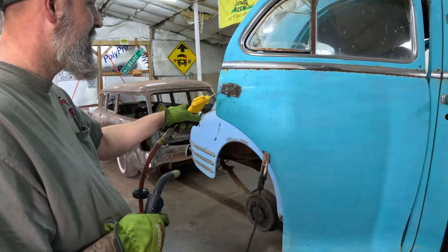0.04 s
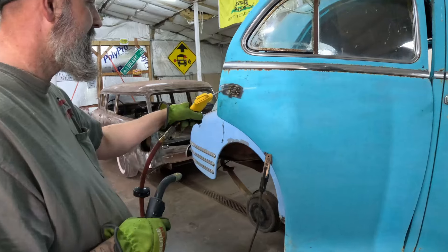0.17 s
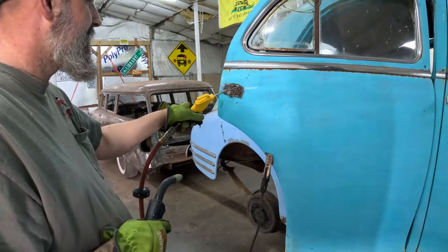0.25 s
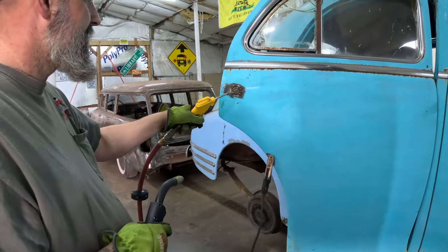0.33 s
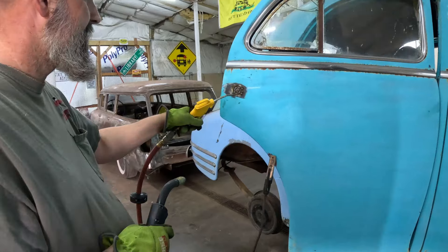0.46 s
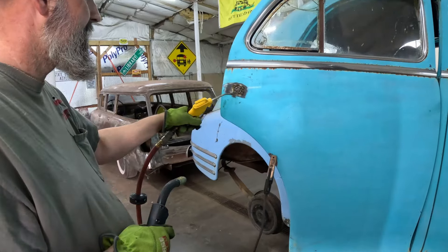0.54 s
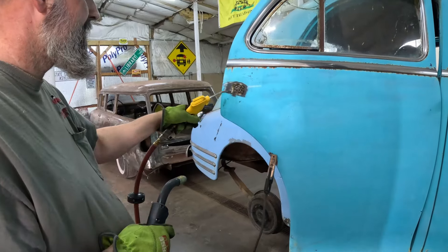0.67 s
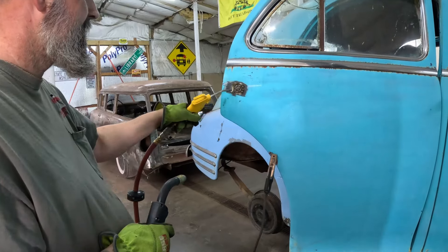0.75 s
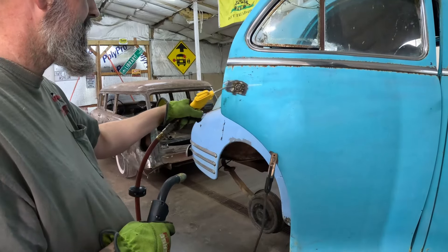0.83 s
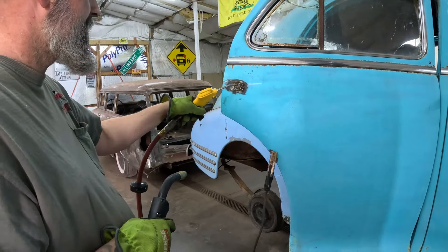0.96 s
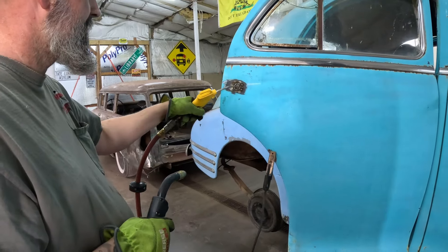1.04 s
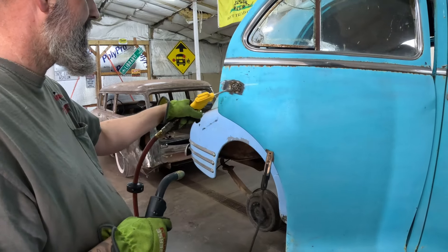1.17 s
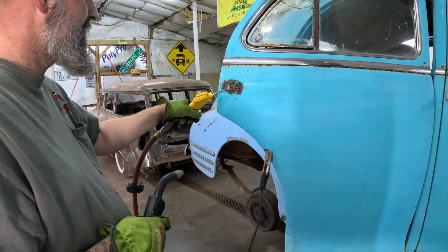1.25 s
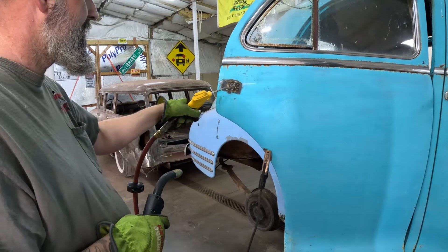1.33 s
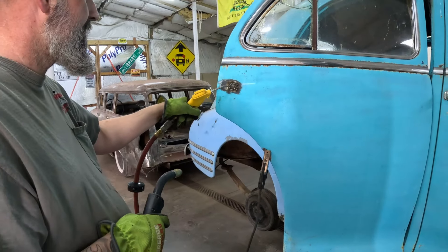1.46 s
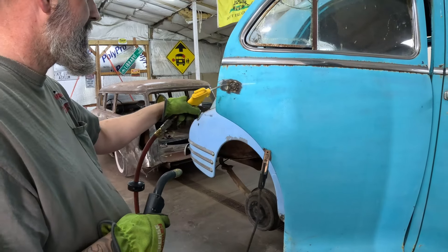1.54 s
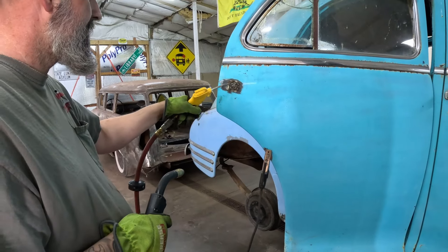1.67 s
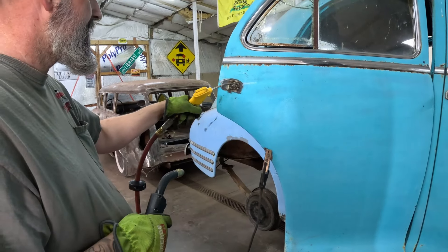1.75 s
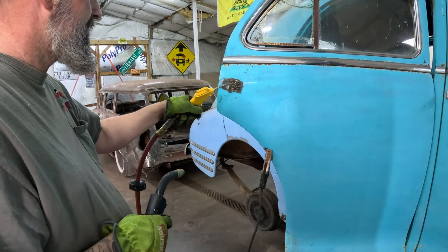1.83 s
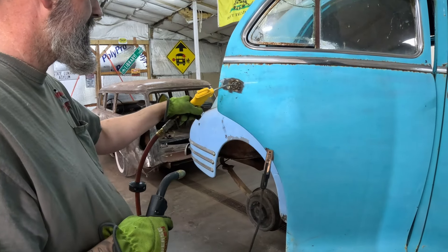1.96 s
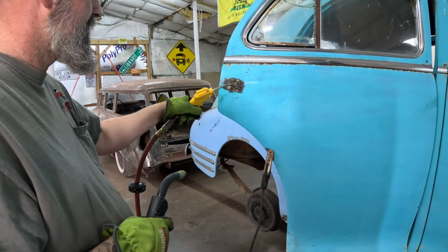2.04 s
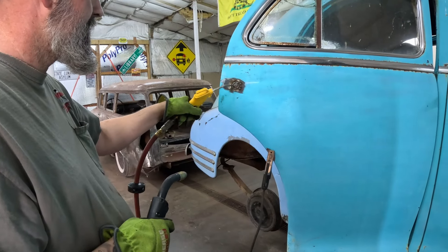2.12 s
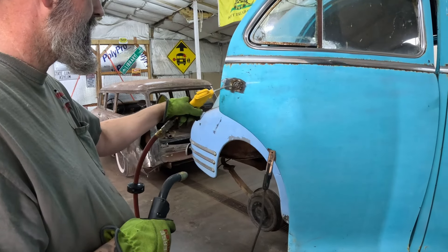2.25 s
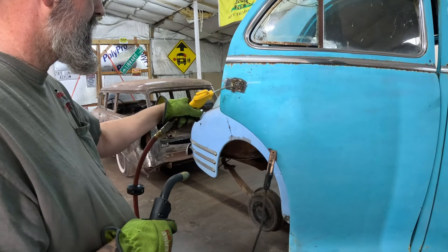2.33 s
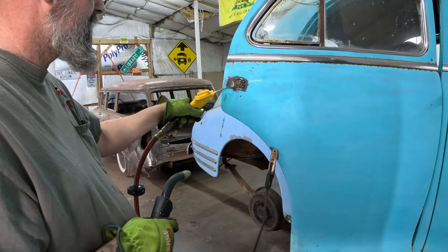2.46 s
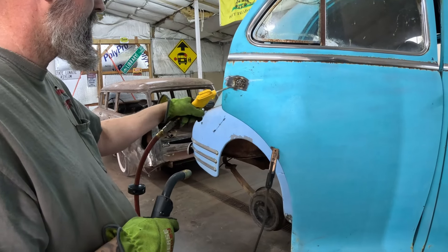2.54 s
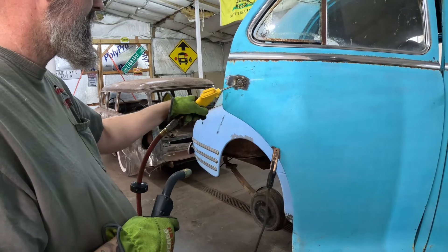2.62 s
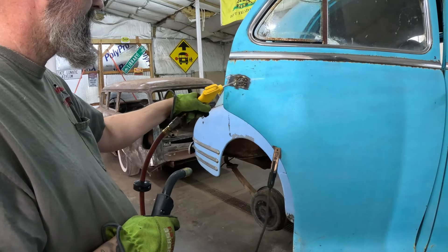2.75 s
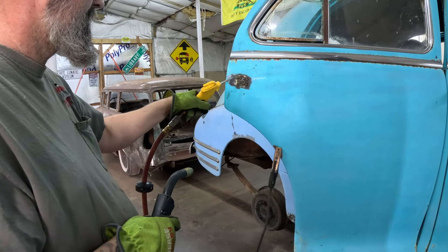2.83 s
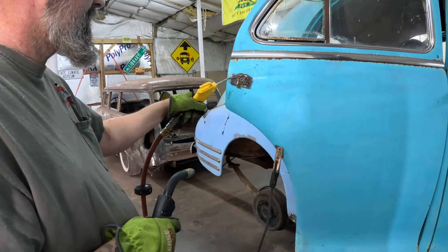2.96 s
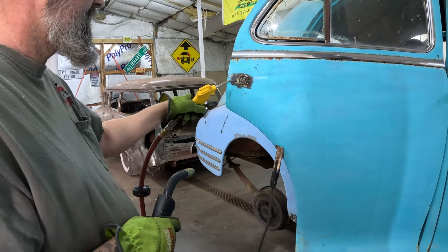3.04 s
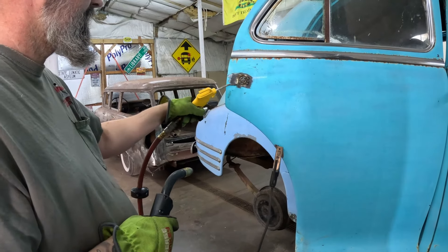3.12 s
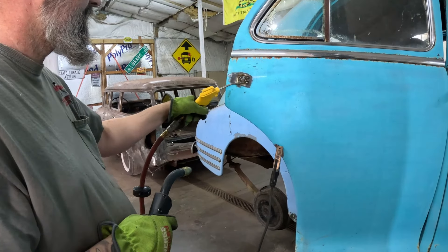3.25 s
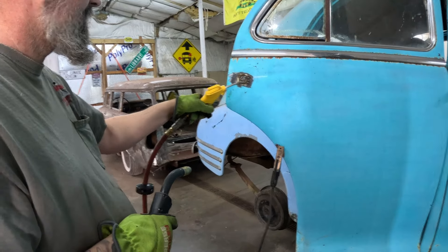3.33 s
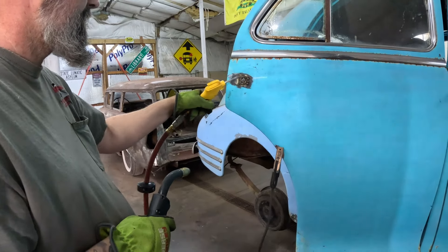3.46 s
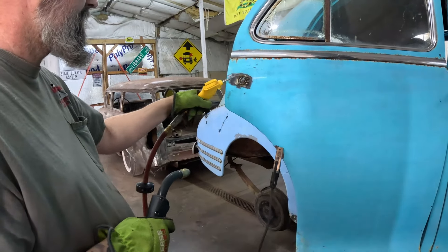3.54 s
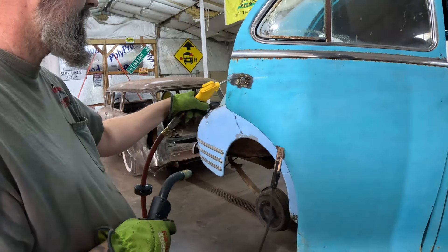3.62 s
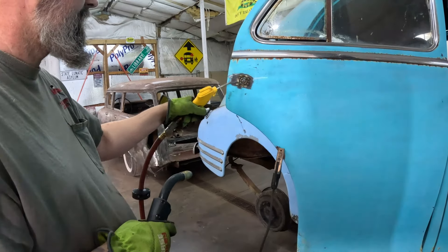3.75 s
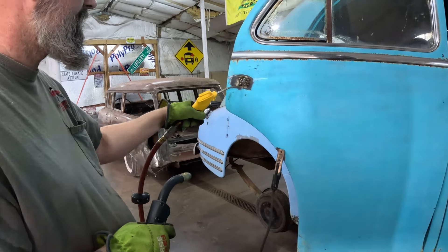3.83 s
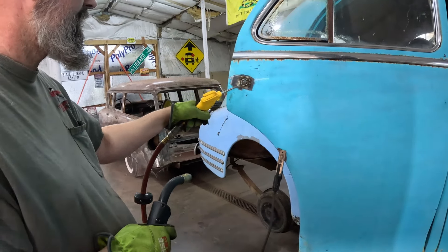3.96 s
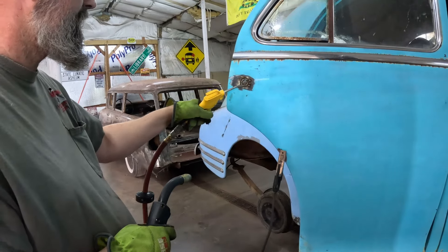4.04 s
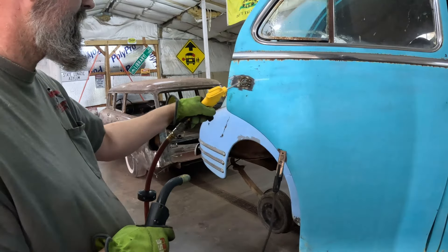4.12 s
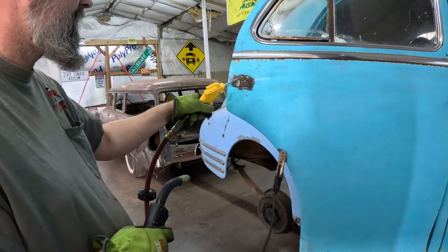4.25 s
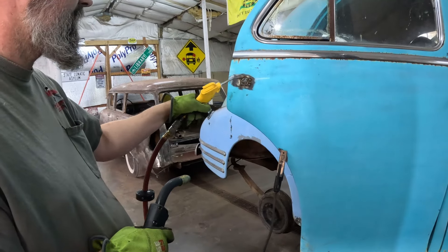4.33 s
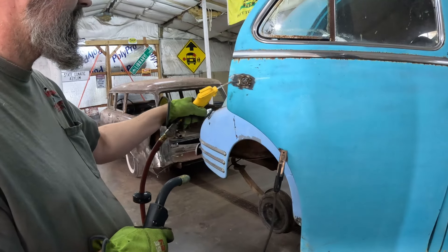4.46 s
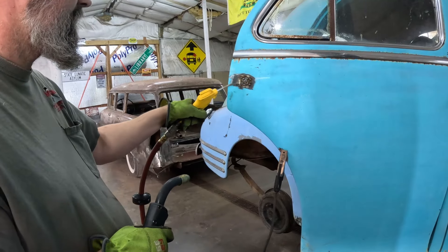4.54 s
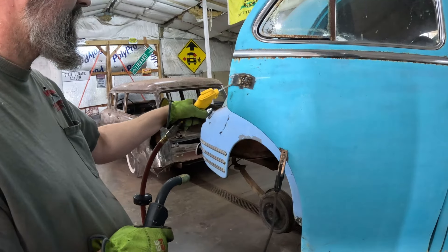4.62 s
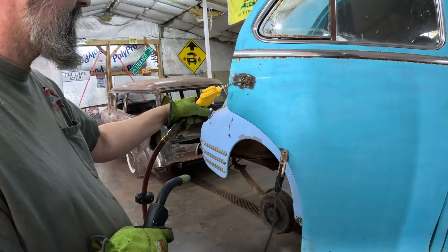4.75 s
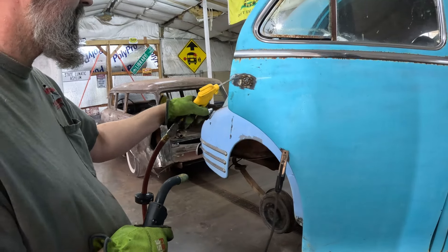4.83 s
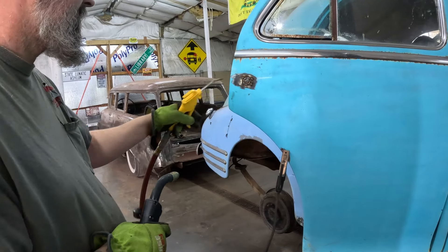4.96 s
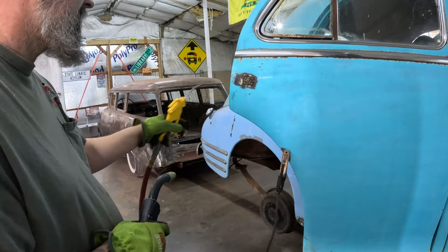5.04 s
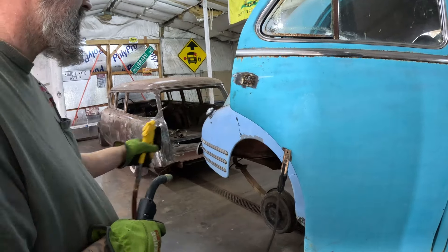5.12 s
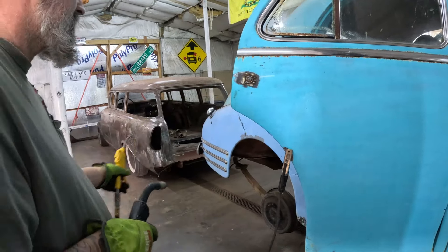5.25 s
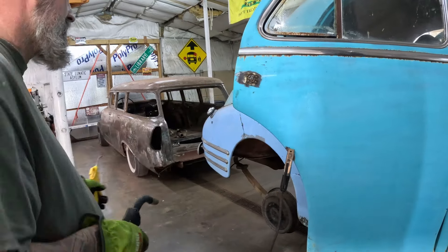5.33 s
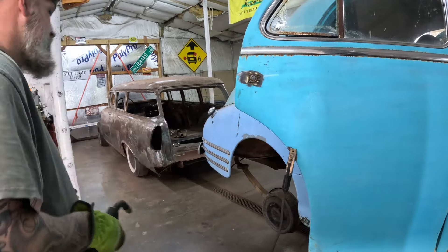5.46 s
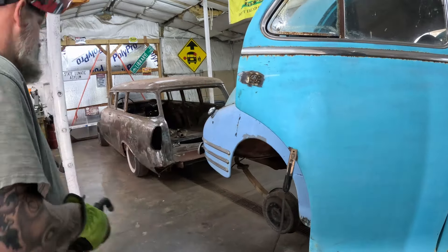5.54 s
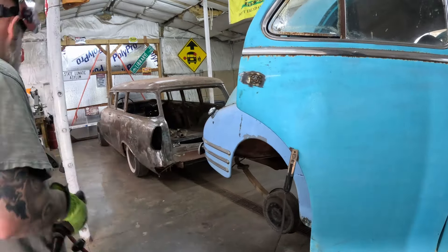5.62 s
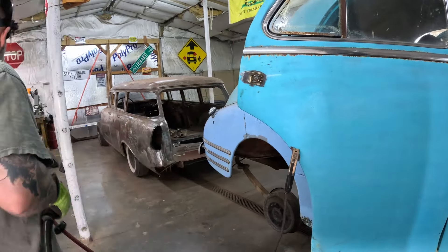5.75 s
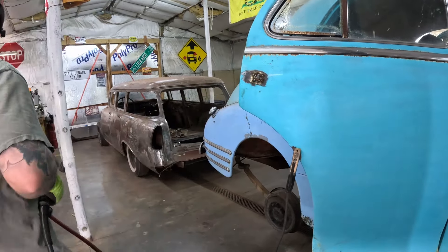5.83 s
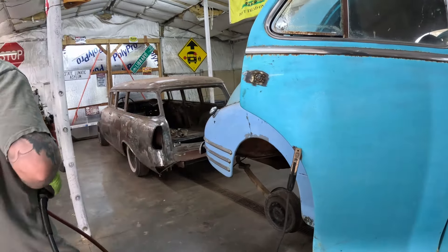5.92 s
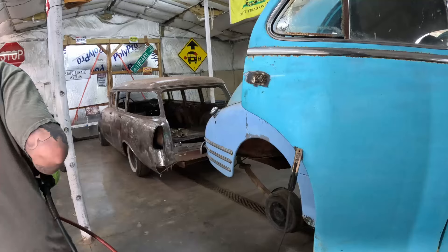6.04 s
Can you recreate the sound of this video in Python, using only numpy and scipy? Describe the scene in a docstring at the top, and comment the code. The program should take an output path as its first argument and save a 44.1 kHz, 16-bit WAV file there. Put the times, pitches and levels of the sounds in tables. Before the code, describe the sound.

A blow gun blasts air along sheet metal, its bright hiss shifting colour and buffeting, then stops abruptly into quiet, faintly humming workshop air.

```python
"""Sheet-metal workshop: a compressed-air blow gun cools a weld on a car body, then the trigger is let go.
The jet is noise shaped over frequency and time: roar off the panel, wide hiss on edges, coloured bands
where it blows across hollows, low buffeting. Its diffuse echo rings out over a low hum of noise
and a sine drone that grows late. One small tick, made of short modes and a rattle, comes near the end."""
import sys
import numpy as np
from scipy import signal
from scipy.io import wavfile
from scipy.ndimage import uniform_filter1d, map_coordinates

SR = 44100
rng = np.random.default_rng(int(sys.argv[2]) if len(sys.argv) > 2 else 0)


def transcribe(u):
    """Save the signal u as a 16-bit wav file named by the first command-line argument.

    u: samples, shape (n,) or (channels, n), limited to [-1, 1]; the rate is SR.
    q: integer samples, one column per channel.
    """
    v = np.clip(np.atleast_2d(u).T, -1, 1)
    q = np.round(v * 32767).astype(np.int16)
    wavfile.write(sys.argv[1], SR, q)


N = 268436
FRAME, OVERLAP = 2048, 1792  # samples
HZ, TIME = signal.stft(np.zeros(N), SR, nperseg=FRAME, noverlap=OVERLAP)[:2]  # grid of all gains


def undb(db):
    """Decibels to gain."""
    return 10 ** (np.asarray(db) / 20)


def at_hz(hz, values, left=None, right=None):
    """Table values at every grid frequency, interpolated over log frequency."""
    return np.interp(np.log(HZ + 1), np.log(hz), values, left, right)


def colour(points):
    """Spectrum in dB as a column; -120 dB outside the table."""
    hz, db = np.transpose(points)
    return at_hz(hz, db, -120, -120)[:, None]


def curves(table):
    """Table columns against time."""
    s, *columns = np.transpose(table)
    return [np.interp(TIME, s, c) for c in columns]


def bump(hz, width_hz):
    """Gaussian of height 1 over frequency; width is its standard deviation."""
    return np.exp(-.5 * ((HZ[:, None] - hz) / width_hz) ** 2)


def patches(width_hz, length_s):
    """Smooth random field over frequency and time, spread 1: eddies never hold one colour."""
    grid = rng.standard_normal((200, 200))
    points = np.meshgrid(HZ / width_hz, TIME / length_s, indexing="ij")
    field = map_coordinates(grid, points, order=1, mode="wrap")
    return field / field.std()


def frames(x):
    """Short-time spectra."""
    return signal.stft(x, SR, nperseg=FRAME, noverlap=OVERLAP)[2]


def filtered(gain):
    """Fresh noise through a gain over frequency and time."""
    spectra = frames(rng.standard_normal(N)) * gain
    return signal.istft(spectra, SR, nperseg=FRAME, noverlap=OVERLAP)[1][:N]


def shaped(shape_db, level_db):
    """Gain whose shape sets the colour only and whose level sets the rms."""
    gain = undb(shape_db) * np.ones(len(TIME))
    return gain * undb(level_db) / np.sqrt(np.mean(gain ** 2, axis=0))


# low note that grows late: t/s, peak level/dB before its wobble
DRONE = [(0, -56.5), (5.0, -58), (5.3, -55), (5.7, -54), (5.8, -47), (6.1, -46)]


def drone():
    """Low sine with an unsteady level."""
    t = np.arange(N) / SR
    level_db = curves(DRONE)[0] + 1.5 * patches(1000, 0.11)[0]
    return undb(np.interp(t, TIME, level_db)) * np.sin(2 * np.pi * 80.4 * t)  # Hz


# hum spectrum, relative: f/Hz, density/dB per Hz
HUM = [(10, -7), (50, -2), (130, -11), (200, -7), (400, -9.5), (650, -10.5), (1000, -16), (1500, -21),
       (2400, -26), (4500, -36), (7000, -49), (9000, -52), (10300, -55.5), (11800, -73)]
# faint whines on the hum: f/Hz, width/Hz, lift/dB
HUM_WHINES = [(206.7, 16, 12), (330, 38, 8.5), (750, 50, 4.5), (1740, 22, 5), (2630, 46, 3.5),
              (3940, 35, 2.5), (4760, 60, 7.5), (6310, 60, 1.5), (8500, 200, 2.5)]
# hum level re HUM_DB: t/s, level/dB
HUM_SWELL = [(0, -7), (.2, -6), (.35, 0.5), (5.2, 2), (5.6, 1.5), (6.1, 1.5)]
HUM_DB = -42


def hum():
    """Machinery and air in the shop: uneven low noise with narrow lifts for whines, plus the drone."""
    whines_db = sum(db * bump(hz, width_hz) for hz, width_hz, db in HUM_WHINES)
    shape_db = colour(HUM) + whines_db + patches(142, .15)
    return drone() + filtered(shaped(shape_db, HUM_DB + curves(HUM_SWELL)[0]))


# knock modes, relative: f/Hz, level/dB, t60/s
KNOCK = [(1700, 4, .04), (2450, -3, .04), (3540, -3, .03), (4700, -8, .03), (6940, -12, .015),
         (10900, -18, .01)]
# t/s, peak level/dB
TICKS = [(5.648, -39)]


def ticks():
    """A small hard knock: short decaying modes over a brief band-passed rattle."""
    out, t = np.zeros(N), np.arange(SR // 10) / SR
    band = signal.butter(3, [900, 4500], "band", fs=SR, output="sos")  # Hz
    rattle = signal.sosfilt(band, rng.standard_normal(len(t))) * np.exp(-t / 0.022)
    modes = sum(undb(db - 60 * t / t60) * np.sin(2 * np.pi * hz * t) for hz, db, t60 in KNOCK)
    knock = (modes + 3.2 * rattle) * np.minimum(t / .001, 1)  # 1 ms attack
    for s, db in TICKS:
        i = int(s * SR)
        out[i:i + len(t)] += undb(db) * knock / np.abs(knock).max()
    return out


# decay of the shop: f/Hz, t60/s
SHOP = [(300, 0.28), (1500, 0.22), (2500, .42), (4000, .5), (7000, 0.57), (12000, 0.25)]
SHOP_DB = -2.5


def shop(dry):
    """Diffuse echo: stored power dies at its own pace per frequency; the moving nozzle leaves no fixed pattern."""
    hz, t60_s = np.transpose(SHOP)
    keep = undb(-120 * TIME[1] / at_hz(hz, t60_s))  # power factor per frame
    power = uniform_filter1d(np.abs(frames(dry)) ** 2, size=9, axis=0)
    for i in range(1, len(TIME)):
        power[:, i] = keep * power[:, i - 1] + (1 - keep) * power[:, i]
    gain = np.sqrt(np.abs(power) * FRAME / 1.5)  # re the window's power for unit noise
    return undb(SHOP_DB) * filtered(gain)


# narrow flutter: t/s, level/dB
FLUTTER = [(0, -56), (.35, -51), (.7, -42), (1.3, -44), (2.0, -47), (2.6, -55), (3.1, -39), (3.5, -50.5),
           (3.75, -38.5), (4.0, -50), (4.3, -39.5), (4.7, -39), (5.0, -51.5)]
FLUTTER_HZ, FLUTTER_WIDTH_HZ = 191, 38


def flutter():
    """Narrow low band of noise gain whose level wanders."""
    bell = bump(FLUTTER_HZ, FLUTTER_WIDTH_HZ)
    level_db = curves(FLUTTER)[0] + 1.15 * patches(199.4, 0.068)
    return bell / np.sqrt(np.mean(bell ** 2)) * undb(level_db)


# thump spectrum, relative: f/Hz, density/dB per Hz
BUFFET = [(10, 2.5), (25, 11), (60, 8), (110, 4), (200, 0), (300, -14.5), (500, -31.5)]
# gusts thrown back off the panel: t/s, level/dB added in amplitude at the peak, standard deviation/s
GUSTS = [(.53, -45, 0.052), (.33, -42, .05), (1.13, -43.5, 0.046), (1.55, -45, 0.033), (1.87, -47, 0.038),
         (2.49, -42.5, 0.028), (2.79, -35.5, .05), (3.45, -41, .1), (3.62, -41, 0.11), (4.18, -35, .07),
         (4.35, -43, 0.06), (4.89, -34, 0.042)]
BUFFET_REST_DB = -54


def buffet():
    """Gusts thump over a low rumble; the flutter adds in power."""
    gusts = sum(undb(db) * np.exp(-.5 * ((TIME - s) / half_s) ** 2) for s, db, half_s in GUSTS)
    shape_db = colour(BUFFET) + 2.0 * patches(68, 0.12)
    thump = shaped(shape_db, 0) * (undb(BUFFET_REST_DB) + gusts)
    return np.hypot(thump, flutter())


# stream creeps onto an edge and slips off: t full hiss/s, t slips off/s, level/dB
EDGES = [(.33, .41, -31), (1.52, 1.6, -43), (1.85, 1.97, -32), (2.2, 2.3, -33.5), (2.47, 2.55, -32.5),
         (2.72, 2.8, -31.5), (3.41, 3.49, -39), (4.1, 4.17, -46), (4.88, 4.95, -55)]
EDGE_RISE_DB_S, EDGE_FALL_DB_S, EDGE_REST_DB = 44.5, 131, -62


def edge_db():
    """Hiss level: slow climb onto each edge, quick drop off it, summed in power."""
    power = undb(EDGE_REST_DB) ** 2
    for full_s, off_s, db in EDGES:
        rise_db = EDGE_RISE_DB_S * np.maximum(full_s - TIME, 0)
        fall_db = EDGE_FALL_DB_S * np.maximum(TIME - off_s, 0)
        power = power + undb(db - rise_db - fall_db) ** 2
    return 10 * np.log10(power)


# edge hiss spectrum, relative: f/Hz, density/dB per Hz
EDGE = [(10300, -37), (11200, 6), (12300, 12.5), (13500, 9), (15000, 4), (16200, 3)]
EDGE_RIGHT_DB = -5  # right re left


def edge_hiss():
    """Finest hiss of the stream on edges, independent noise left and right."""
    sides = []
    for offset_db in (0, EDGE_RIGHT_DB):
        shape_db = colour(EDGE) + 1.5 * patches(380, .12)
        sides.append(filtered(shaped(shape_db, edge_db() + offset_db)))
    return np.array(sides)


# low hollows blown across: t start/s, t end/s, first f/Hz, last f/Hz, lift/dB
LOW_HOLLOWS = [(0.702, 2.006, 2539, 2650, 4.5), (2.1, 2.452, 2250, 2380, 6), (2.5, 3.0, 2780, 2820, 1),
               (3.0, 3.303, 2320, 2250, 5), (3.45, 4.6, 3040, 3120, 3), (4.6, 5.1, 3150, 3160, 4.5)]
# high hollow: t/s, f/Hz, lift/dB
HIGH_HOLLOW = [(0, 7900, .5), (1.2, 7640, -0.5), (2.0, 7200, 1), (2.9, 9000, 1), (3.5, 9160, 3.5),
               (5.0, 8900, 3.5)]
LOW_WIDTH_HZ, HIGH_WIDTH_HZ, HOLLOW_FADE_S = 110, 350, .08


def hollows_db():
    """Cavities colour gliding bands of the roar; each low one also weakens a broad band 550 Hz under its note."""
    high_hz, high_lift_db = curves(HIGH_HOLLOW)
    lift = high_lift_db * bump(high_hz, HIGH_WIDTH_HZ)
    for start_s, end_s, first_hz, last_hz, lift_db in LOW_HOLLOWS:
        hz = np.interp(TIME, [start_s, end_s], [first_hz, last_hz])
        over = np.clip(np.minimum(TIME - start_s, end_s - TIME) / HOLLOW_FADE_S + .5, 0, 1)
        weakened = 0.18 * bump(hz - 550, 260)
        lift = lift + lift_db * over * (bump(hz, LOW_WIDTH_HZ) - weakened)
    return lift


TUBE_HZ, TUBE_DB, TUBE_FADE_HZ = 703, 2.5, 4020


def tube_db():
    """Air column of the long nozzle: lifts at multiples of TUBE_HZ, weaker upward."""
    comb = np.cos(np.pi * HZ / TUBE_HZ) ** 6
    return TUBE_DB * (comb * np.exp(-HZ / TUBE_FADE_HZ))[:, None]


# roar spectrum, relative: f/Hz, density/dB per Hz
ROAR = [(150, -41), (250, -11.5), (342, -6.5), (627, -13.5), (696, -8.5), (967, -12.5), (1190, -12),
        (1420, -4.5), (1740, -5), (3200, 1), (4080, 0), (8600, -2.5), (12200, -14.5), (14500, -32),
        (16200, -38)]


def roar(level_db, low_db, bright_db):
    """Turbulent noise gain; the aim of the nozzle tilts both flanks of its spectrum."""
    eddies_db = .5 * patches(300, .25) + 1.2 * patches(50, .2) + 0.73 * patches(1800, .05)
    aim_db = low_db * bump(1000, 1100) + bright_db * bump(8540, 1800)  # Hz
    return shaped(colour(ROAR) + eddies_db + aim_db + hollows_db() + tube_db(), level_db)


# side noise re stream, before its random patches: f/Hz, level/dB
SIDE = [(10, -17), (200, -19), (700, -15), (1300, -20), (2400, -26), (4400, -24), (8000, -23), (11000, -22)]
# spans where faint side noise is switched on: t start/s, t end/s
SIDE_SPANS = [(0, 1.046), (1.831, 1.9), (2.021, 2.15), (2.749, 2.97), (3.06, 3.28), (4.026, 4.148),
              (4.33, 4.8), (4.978, 5.8)]


def side_noise(stream):
    """Side noise following the stream's gain, opposite left and right, switched on and off abruptly."""
    on = sum((TIME >= start_s) * (TIME < end_s) for start_s, end_s in SIDE_SPANS)
    side = filtered(stream * on * undb(colour(SIDE) + 6.4 * patches(500, .05)))
    return np.array([side, -side])


# jet as the nozzle sweeps: t/s, roar level/dB, low-mid lift/dB, treble lift/dB
JET = [(0.0, -26.5, 8, 4.5), (0.15, -29, 0, 3.5), (0.31, -26.5, 0, 3), (0.45, -24.5, -2, 2),
       (0.7, -24.5, 1, 0.5), (1.45, -24.5, 1, 1), (1.95, -25, -1, 1), (2.1, -26.5, 4, 1.5),
       (2.25, -25, 0.5, 1), (2.55, -26, 2, 0.5), (2.8, -24, -3, 0.5), (3.1, -25, 4.5, 1.5),
       (3.33, -24.5, 1.5, -0.5), (3.45, -23, 0, 1.5), (4.1, -23, -2, 0), (4.72, -24.5, 2.5, -2),
       (4.92, -22, -5.5, 1.5), (5.0, -27.5, 2.5, -2.5)]
CLOSING_TAU_S = 0.04


def valve():
    """Flow 1 while the trigger is held, exponential decay from the last jet entry on."""
    since_release_s = np.maximum(np.arange(N) / SR - JET[-1][0], 0)
    return np.exp(-since_release_s / CLOSING_TAU_S)


def jet():
    """The jet left and right: roar, buffeting and edge hiss, with faint side noise switched in at times, all
    through the valve."""
    stream = np.hypot(roar(*curves(JET)), buffet())
    return valve() * (filtered(stream) + side_noise(stream) + edge_hiss())


def scene():
    """The jet and its echo over the hum of the shop, with the tick."""
    near = jet()
    return near + shop(near.mean(axis=0)) + hum() + ticks()


TOP_HZ = 15830


def record(dry):
    """Steep elliptic low-pass at TOP_HZ."""
    return signal.sosfilt(signal.ellip(12, .2, 80, TOP_HZ, fs=SR, output="sos"), dry)


dry = scene()
out = record(dry)
transcribe(out)
```